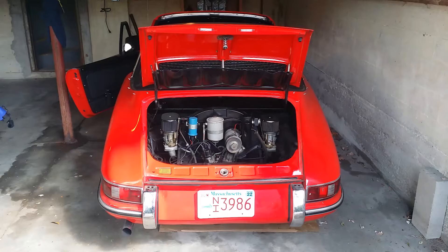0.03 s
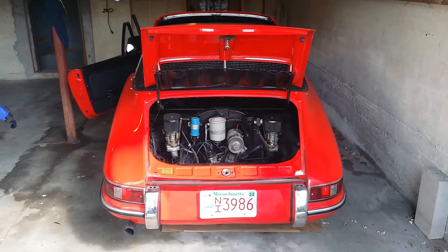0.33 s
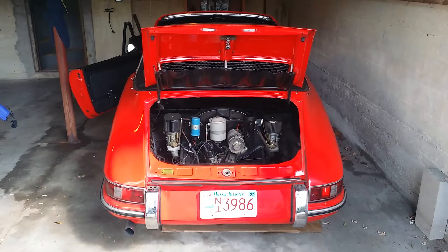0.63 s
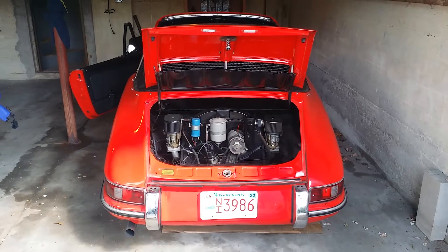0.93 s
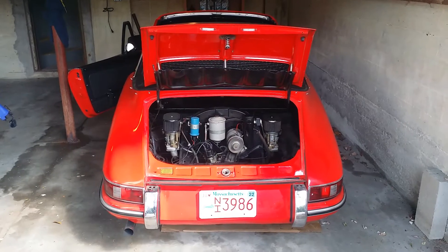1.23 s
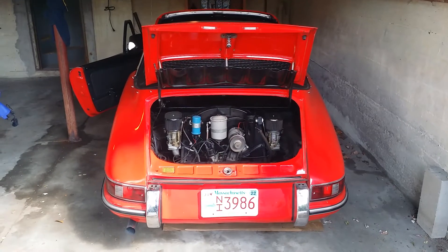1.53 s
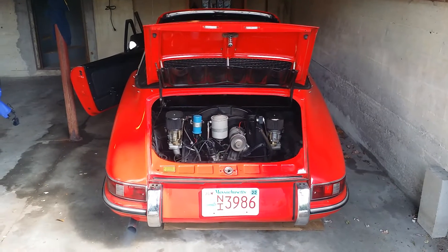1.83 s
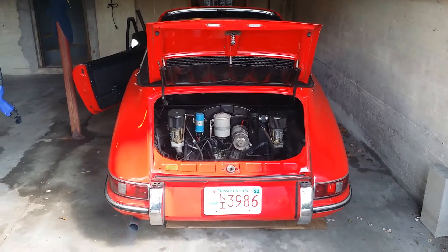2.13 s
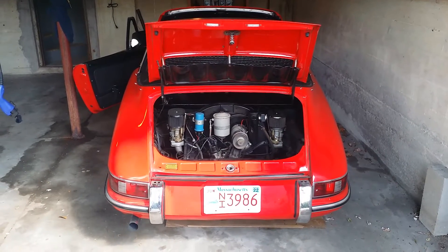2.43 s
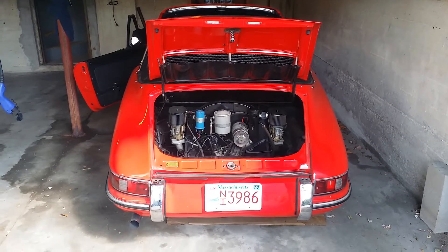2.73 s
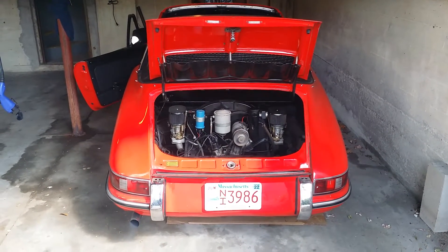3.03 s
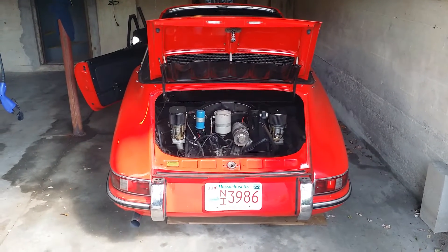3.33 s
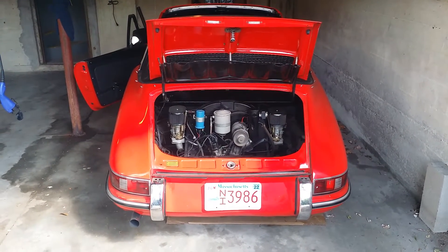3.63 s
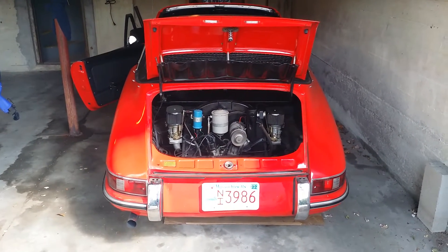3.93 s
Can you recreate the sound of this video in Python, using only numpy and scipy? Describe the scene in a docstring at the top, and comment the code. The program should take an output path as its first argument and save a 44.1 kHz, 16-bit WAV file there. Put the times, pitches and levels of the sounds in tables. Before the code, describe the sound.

A car engine fires up and revs loudly, heard from a few metres in a small garage. Light metal clacks and a short crank come first, then exhaust booms, roaring air and valve clatter swell and dip, overloading the microphone.

```python
"""A throttle linkage clacks and squeaks, then a starter bangs in and an air-cooled flat-six catches.
The engine is blipped three times in a concrete garage, lid open, a few metres away.
Each firing booms in the exhaust and barks in the intakes; air roars in puffs and valves tap over the fan.
The sum overloads the input stage, so each boom chops the hiss."""
import sys
import numpy as np
from scipy import signal
from scipy.fft import rfft, irfft
from scipy.io import wavfile

SR = 44100
rng = np.random.default_rng(int(sys.argv[2]) if len(sys.argv) > 2 else 0)


def wav_out(sig):
    """Save sig, one row per channel (or a flat mono array), as 16-bit PCM at SR to the path in sys.argv[1]."""
    wavfile.write(sys.argv[1], SR, np.round(np.clip(np.atleast_2d(sig).T, -1, 1) * 32767).astype(np.int16))


N = 176400
T = np.arange(N) / SR


def undb(db):
    """Decibels to gain."""
    return 10 ** (np.asarray(db) / 20)


def unit(x):
    """Scale to rms 1."""
    return x / np.sqrt(np.mean(x ** 2) + 1e-18)


def curve(rows, column=1):
    """Table column, linearly interpolated in time."""
    rows = np.array(rows, float)
    return np.interp(T, rows[:, 0], rows[:, column])


def colour(x, points):
    """Minimum-phase filter from (frequency [Hz], gain [dB]) points."""
    size = 16384
    hz, db = np.array(points, float).T
    bins_hz = np.maximum(np.arange(size // 2 + 1) * SR / size, 1)
    gain = undb(np.interp(np.log(bins_hz), np.log(hz), db))
    cepstrum = irfft(np.log(gain))
    cepstrum[1:size // 2] *= 2
    cepstrum[size // 2 + 1:] = 0
    return signal.fftconvolve(x, irfft(np.exp(rfft(cepstrum))))[:N]


def noise(points):
    """Coloured noise, rms 1."""
    return unit(colour(rng.standard_normal(N), points))


def narrowband(phase):
    """Narrow noise band around a tone."""
    return sum(noise([(130, -1), (400, -10), (2000, -53)]) * wave(phase) for wave in (np.sin, np.cos))


def glide(start_s, length_s, from_hz, to_hz):
    """Phase of a linear pitch slide."""
    return 2 * np.pi * np.cumsum(np.interp(T, [start_s, start_s + length_s], [from_hz, to_hz])) / SR


def strike(start_s, decay_s):
    """Instant rise, exponential fall."""
    return (T >= start_s) * np.exp(-np.abs(T - start_s) / decay_s)


def ring(start_s, hz, decay_s):
    """One struck mode."""
    return strike(start_s, decay_s) * np.sin(2 * np.pi * hz * (T - start_s))


def arch(start_s, length_s):
    """Half-sine swell."""
    return np.sin(np.pi * np.clip((T - start_s) / length_s, 0, 1))


def pulses(times_s, sizes):
    """Impulses split between neighbouring samples."""
    position = np.clip(times_s * SR, 0, N + 1)
    i, out = position.astype(int), np.zeros(N + 3)
    np.add.at(out, i, sizes * (1 - position + i))
    np.add.at(out, i + 1, sizes * (position - i))
    return out[:N]


# background spectrum (frequency [Hz], level [dB])
RUMBLE_SPECTRUM = [(15, -22), (25, 7), (70, -2.5), (130, 1), (180, -11), (450, -19), (770, -35),
                   (2000, -50), (3200, -46), (5000, -44), (8000, -39), (15000, -45)]

def rumble():
    """Faint, steady low room noise."""
    return undb(-40) * noise(RUMBLE_SPECTRUM)


def garage(x, wet_db, t60_s=0.47):
    """Direct sound plus a short, duller tail off bare concrete."""
    tail = rng.standard_normal(N) * undb(-60 * T / t60_s) * (T > .006)
    tail = colour(tail, [(5600, 0), (16000, -10)])
    return x + undb(wet_db) * signal.fftconvolve(x, tail / np.sqrt(np.sum(tail ** 2)))[:N]


# squeaks and thin whistles (time [s], length [s], from [Hz], to [Hz], level [dB])
SPRING_SQUEAKS = [(-.02, 0.049, 10130, 10050, -26.5), (0.259, 0.035, 10400, 10000, -31.5),
                  (.272, 0.024, 3440, 3350, -39), (.273, 0.035, 6800, 6950, -39),
                  (.274, .03, 13600, 13400, -46), (0.3, .035, 9650, 9550, -36),
                  (.53, .18, 10200, 8700, -67), (0.563, 0.085, 3200, 3000, -51)]

def springs():
    """Return springs squeak in short, wavering tones."""
    out = np.zeros(N)
    for start_s, length_s, from_hz, to_hz, db in SPRING_SQUEAKS:
        phase = glide(start_s, length_s, from_hz, to_hz)
        waver = .6 * noise([(200, -4), (900, -40)])
        out += undb(db) * arch(start_s, length_s) * np.sin(phase + waver)
    return out


# metal impact spectrum, also the pinion's (frequency [Hz], level [dB])
CLACK_SPECTRUM = [(130, -33), (248, 1), (530, -19), (1020, -8), (1220, -10), (1340, -2), (1730, -10),
                  (1980, 3.5), (2550, -19), (3830, -15), (5130, -3), (15500, -27)]
# linkage impacts (time [s], level [dB], decay [s])
LINKAGE_CLACKS = [(0.014, -18, 0.016), (0.035, -19, 0.0095), (.324, -32.5, 0.015), (0.336, -23, 0.018),
                  (.36, -19.5, 0.01)]
# friction spectrum (frequency [Hz], level [dB])
RUB_SPECTRUM = [(59, -43), (100, -17), (146, -19), (268, -4), (337, -7), (600, -13), (1290, -20.5),
                (2180, -15), (3320, -30), (5480, -23), (15000, -51)]
# friction envelope (time [s], level [dB])
RUB_LEVEL = [(0, -42), (.03, -27.5), (.08, -34.5), (.115, -27), (.14, -32), (.165, -30.5), (.25, -42),
             (.31, -43), (.37, -33.5), (.45, -44), (.55, -68)]
# breathy chirps (time [s], length [s], from [Hz], to [Hz], level [dB])
LINKAGE_CHIRPS = [(0.442, 0.088, 5000, 4660, -37), (0.492, 0.07, 4200, 3990, -40.5)]

def linkage(creak_hz=253):
    """The throttle is pumped: clacks, rubbing, a low creak, falling chirps."""
    clacks = sum(undb(db) * strike(start_s, decay_s) for start_s, db, decay_s in LINKAGE_CLACKS)
    out = noise(CLACK_SPECTRUM) * clacks
    out += noise(RUB_SPECTRUM) * undb(curve(RUB_LEVEL))
    out += undb(-31.5) * arch(0.18, 0.15) * np.sin(2 * np.pi * creak_hz * T)
    for start_s, length_s, from_hz, to_hz, db in LINKAGE_CHIRPS:
        out += undb(db) * arch(start_s, length_s) * narrowband(glide(start_s, length_s, from_hz, to_hz))
    return out


# solenoid snap spectrum (frequency [Hz], level [dB])
SOLENOID_SPECTRUM = [(180, -38), (430, -7), (1150, -19), (2060, 6), (2800, -4), (3070, 0), (4260, -4),
                     (5110, 17), (5800, 4), (15500, -8)]
# gear noise spectrum (frequency [Hz], level [dB])
GEAR_SPECTRUM = [(18, -25), (32, 5), (60, -1), (120, -5), (175, 7.5), (210, -16), (260, 2.5), (340, -0.5),
                 (450, -3.5), (620, -8.5), (1300, -6), (1990, 0.5), (3050, -18), (5270, -7), (10300, -35),
                 (15500, -46)]
# gear noise envelope (time [s], level [dB])
GEAR_LEVEL = [(.79, -44.5), (.825, -14.5), (.84, -7.5), (.865, -12), (.92, -18), (.98, -23.5),
              (1.06, -13.5), (1.2, -19.5), (1.3, -60)]
# metal squeals as the engine catches (time [s], length [s], pitch [Hz], level [dB])
CATCH_SQUEALS = [(1.096, 0.046, 8070, -15), (1.2, .035, 8600, -20)]

def starter(solenoid_s=.786, pinion_s=.824, tooth_hz=173, pump_hz=31.4):
    """Solenoid snaps, pinion hits the ring gear, gearbox housing rings, motor hums, cylinders pump."""
    snap = undb(-10) * noise(SOLENOID_SPECTRUM) * strike(solenoid_s, decay_s=.014)
    crash = undb(-7.5) * noise(CLACK_SPECTRUM) * strike(pinion_s, decay_s=.02)
    housing = undb(-30) * ring(pinion_s, hz=331, decay_s=0.066)
    tooth_wave = np.sin(2 * np.pi * tooth_hz * T)
    gears = noise(GEAR_SPECTRUM) * undb(curve(GEAR_LEVEL)) * (1 + 0.085 * tooth_wave)
    hum = undb(-29) * tooth_wave * arch(0.81, 0.44)
    pump = undb(-22) * np.sin(2 * np.pi * pump_hz * T) * arch(0.87, 0.33)
    squeals = sum(undb(db) * arch(start_s, length_s) * narrowband(2 * np.pi * hz * T)
                  for start_s, length_s, hz, db in CATCH_SQUEALS)
    return snap + crash + housing + gears + hum + pump + squeals


# engine speed (time [s], firing rate [Hz])
FIRING_RATE = [(1.05, 28.7), (1.11, 29.71), (1.29, 40.86), (1.40, 57.9), (1.48, 52.65), (1.57, 67.2),
               (1.69, 80.55), (1.81, 74.55), (1.9, 64.8), (1.99, 90.7), (2.1, 113.5), (2.17, 118.4),
               (2.29, 112.9), (2.42, 98.94), (2.62, 79), (2.77, 67.03), (2.89, 55.04), (3.05, 44.4),
               (3.17, 44), (3.3, 58.32), (3.42, 70.32), (3.52, 77.13), (3.66, 65.6), (3.8, 50.9),
               (4.0, 39.68)]
# cylinder imbalance in firing order (level [dB])
CYLINDER_DB = [2, -4.5, -2.5, -5.5, -3, -1.5]
CATCH_S, IDLE_HZ, SMOOTH_HZ = FIRING_RATE[0][0], 46, 62

def firings():
    """Running firing count per sample; time, rate and cylinder level per firing."""
    firing_hz = curve(FIRING_RATE)
    cycles = np.cumsum(firing_hz * (T > CATCH_S)) / SR
    index = np.arange(int(cycles[-1]))
    times_s = np.interp(index + 1e-6, cycles, T)
    return cycles, times_s, np.interp(times_s, T, firing_hz), np.take(CYLINDER_DB, index, mode="wrap")


# valve and fan spectrum (frequency [Hz], level [dB])
CLATTER_SPECTRUM = [(120, -40), (260, -2.5), (370, -1.5), (470, -1.5), (640, -14.5), (860, -6), (1100, -10),
                    (1400, -10), (1950, -1.5), (2700, -12), (3500, -9.5), (5100, -13), (6600, -27),
                    (8000, -17), (10200, -52), (15500, -36)]

def valves_and_fan(cycles, tap_decay_s=0.018, scatter_db=7, rise_s=0.055, db_per_octave=3.5):
    """Two valve taps per firing over steady fan noise, louder with speed."""
    tap_cycles = np.arange(2 * int(cycles[-1])) / 2
    slip, force = rng.standard_normal((2, len(tap_cycles)))
    taps = pulses(np.interp(tap_cycles + 0.071 * slip, cycles, T), undb(scatter_db * force))
    taps = signal.lfilter([1], [1, -np.exp(-1 / (tap_decay_s * SR))], taps)
    running = np.clip((T - CATCH_S) / rise_s, 0, 1)
    level_db = -13.5 + db_per_octave * np.log2(curve(FIRING_RATE) / SMOOTH_HZ)
    return noise(CLATTER_SPECTRUM) * unit(taps + 1) * running * undb(level_db)  # 1: the fan


# throttle envelopes (time [s], roar level [dB], bark level [dB])
INTAKE_LEVELS = [(.99, -46, -52), (1.04, -21, -46), (1.12, -17, -21), (1.2, -8, -31), (1.25, -7.5, -9.5),
                 (1.42, -7.5, -11.5), (1.6, -5, -1), (1.74, -7.5, -5), (1.8, -12.5, -17),
                 (1.88, -9.5, -6.5), (1.97, -4, -5), (2.13, -2.5, -2), (2.34, -5.5, -17.5),
                 (2.56, -5.5, -10.5), (2.65, -11.5, -17.5), (2.76, -12, -6.5), (2.85, -18, -12.5),
                 (3.19, -17, -17.5), (3.24, -7.5, -16), (3.4, -7.5, -7), (3.49, -7.5, -8.5),
                 (3.535, -12, -11), (3.585, -11.5, -6.5), (3.8, -18.5, -17.5), (4.0, -29, -27)]
# low intake bark spectrum (frequency [Hz], level [dB])
BARK_SPECTRUM = [(60, -24), (110, -6.5), (138, -3), (160, -3), (180, 0), (207, -1.5), (250, -9), (290, -15),
                 (360, -9), (500, -21.5), (900, -22), (3000, -51.5)]
# intake roar spectrum (frequency [Hz], level [dB])
ROAR_SPECTRUM = [(100, -18), (250, -20.5), (370, -10.5), (520, -13), (720, -5.5), (880, -5.5), (1120, -7),
                 (1500, -2.5), (1950, -3.5), (2500, -10), (3100, -11.5), (4200, -10.5), (5150, -4),
                 (6900, -9.5), (10000, -14.5), (15500, -20)]
# carburettor throat rasp spectrum (frequency [Hz], level [dB])
RASP_SPECTRUM = [(2800, -32), (4300, -2), (5200, -0.5), (6100, -4), (9000, -28.5), (15500, -23)]
# rasp envelope (time [s], level [dB])
RASP_LEVEL = [(1.0, -39), (1.04, -15.5), (1.2, -16), (1.38, -11.5), (1.75, -14.5), (1.85, -17), (2.1, -33),
              (2.3, -7.5), (2.56, -12), (2.63, -16.5), (3.18, -27), (3.24, -20), (3.54, -14), (3.7, -20),
              (4.0, -27.5)]

def intake(cycles, times_s, rate_hz, cylinder_db, load, puff_cycles=0.36, scatter_db=3):
    """Each firing barks, rougher under load, and draws a puff of roaring, rasping air."""
    slip, force = rng.standard_normal((2, len(times_s))) * np.interp(times_s, T, load)
    sizes = undb(cylinder_db / 2 + scatter_db * force) / np.sqrt(rate_hz)
    kicks = pulses(times_s + .07 * slip / rate_hz, sizes)
    puff = np.exp(-(cycles % 1) / puff_cycles) * (T > CATCH_S)
    gas = rng.standard_normal(N) * puff
    bark = unit(colour(unit(kicks) + .6 * load * unit(gas), BARK_SPECTRUM))
    bark *= undb(curve(INTAKE_LEVELS, column=2))
    puff_sizes = undb(scatter_db * rng.standard_normal(len(times_s) + 1))
    airflow = unit(1 + puff * puff_sizes[cycles.astype(int)]) * (T > INTAKE_LEVELS[0][0])
    roar = noise(ROAR_SPECTRUM) * undb(curve(INTAKE_LEVELS))
    rasp = noise(RASP_SPECTRUM) * undb(curve(RASP_LEVEL))
    return bark + (roar + rasp) * airflow


# stray heavy firings (time [s], level [dB])
HEAVY_FIRINGS = [(1.078, 5), (1.236, -6), (1.279, 7), (1.428, -15), (2.169, 2), (2.217, 9.5), (3.003, 6),
                 (3.89, -5), (3.959, 1)]
# lowest exhaust modes (frequency [Hz], gain [dB])
EXHAUST_MODES = [(34, -15), (63, -10.5)]

def thumps():
    """Stray heavy firings shake the exhaust at its lowest resonances."""
    return sum(undb(db + mode_db) * ring(start_s, hz, decay_s=0.024)
               for start_s, db in HEAVY_FIRINGS for hz, mode_db in EXHAUST_MODES)


# exhaust and garage resonances (frequency [Hz], gain [dB])
EXHAUST_RESPONSE = [(12, -34), (22, -13), (33, 8.5), (44, 3), (55, 2.5), (68, 3.5), (77, 4), (88, -4),
                    (100, -12), (120, -18.5), (160, -7), (205, -16.5), (260, -32), (400, -33), (900, -78)]
# exhaust pulse strength (time [s], level [dB])
EXHAUST_LEVEL = [(1.02, -66), (1.08, -9), (1.25, -4.5), (1.42, -4.5), (1.6, 3.5), (1.73, -4), (1.81, 4),
                 (1.88, 3), (1.96, -0.5), (2.1, 4), (2.32, -1.5), (2.44, 1), (2.53, -1), (2.64, 2.5),
                 (2.78, 6), (2.88, -0.5), (3.15, -8), (3.3, 1), (3.46, 5), (3.53, -4.5), (3.58, 2),
                 (3.65, 7), (3.76, -2.5), (4.0, -7.5)]

def exhaust(times_s, rate_hz, cylinder_db, load, jitter_cycles=0.076, scatter_db=2.5):
    """Firings boom in the pipe; uneven ones ring the garage's standing wave into a burble."""
    # lumpy at idle and under load, clean on the overrun
    least_lumpy = np.maximum(.12, .5 * np.interp(times_s, T, load))
    lumpy = np.clip((SMOOTH_HZ - rate_hz) / (SMOOTH_HZ - IDLE_HZ), least_lumpy, 1)
    slip, force, kick = rng.standard_normal((3, len(times_s)))
    uneven_s = times_s + jitter_cycles * lumpy * slip / rate_hz
    sizes = undb(lumpy * (cylinder_db + scatter_db * force))
    boom = colour(pulses(uneven_s, sizes * SR / rate_hz / 2), EXHAUST_RESPONSE)
    standing_wave = ring(0, hz=78.8, decay_s=0.026)
    burble = signal.fftconvolve(pulses(uneven_s, lumpy * np.tanh(kick)), standing_wave)[:N]
    return (boom + undb(-10) * unit(burble)) * undb(curve(EXHAUST_LEVEL))


def scene():
    """Rumble, engine bay with its garage tail, and exhaust, in mono."""
    cycles, times_s, rate_hz, cylinder_db = firings()
    load = np.minimum(undb(curve(INTAKE_LEVELS) + 5.5) ** 2, 1)  # full from -5.5 dB of roar
    low = exhaust(times_s, rate_hz, cylinder_db, load) + thumps()
    high = valves_and_fan(cycles) + intake(cycles, times_s, rate_hz, cylinder_db, load)
    bay = garage(linkage() + starter() + high, wet_db=-12) + garage(springs(), wet_db=-3)
    return (rumble() + bay + low)[None]


def record(dry, ceiling=.71, knee=5, sag_hz=1.9, top_hz=15900):
    """The input stage clips hard, its flat tops sag slightly, and the top is cut."""
    clipped = dry / (12.5 + np.abs(dry / ceiling) ** knee) ** (1 / knee)
    sagged = signal.sosfilt(signal.butter(1, sag_hz, "high", fs=SR, output="sos"), clipped)
    return signal.fftconvolve(sagged, signal.firwin(301, top_hz, fs=SR)[None], mode="same")


dry = scene()
out = record(dry)
wav_out(out)
```